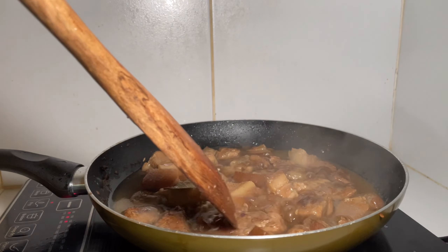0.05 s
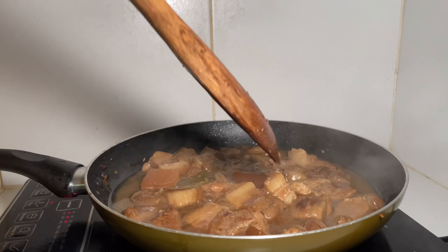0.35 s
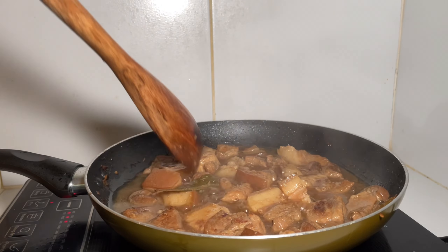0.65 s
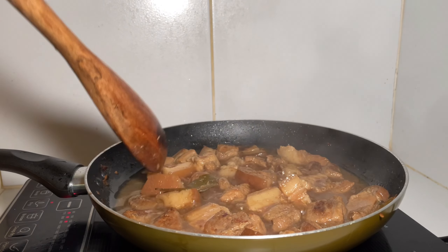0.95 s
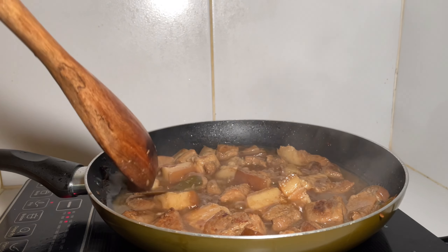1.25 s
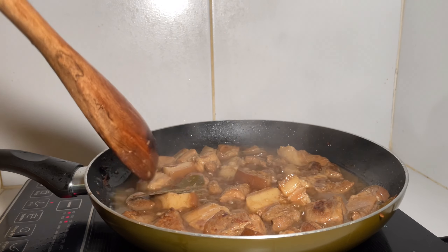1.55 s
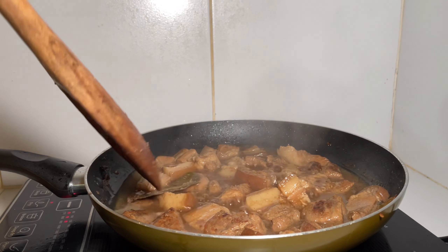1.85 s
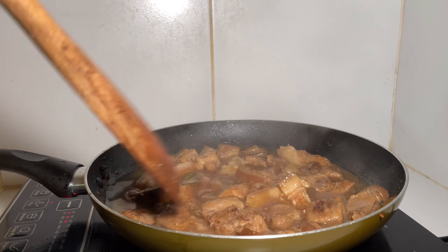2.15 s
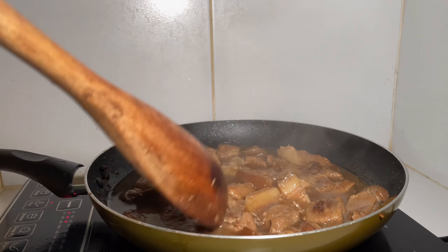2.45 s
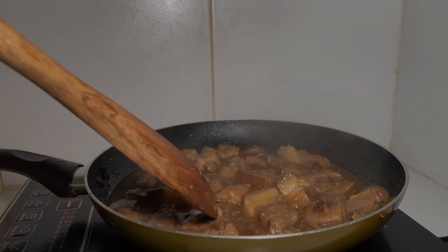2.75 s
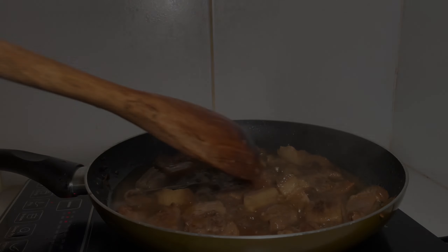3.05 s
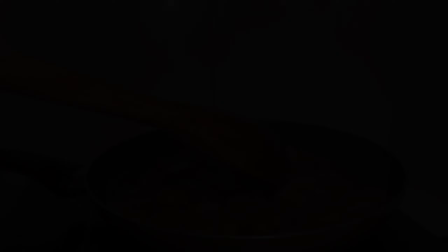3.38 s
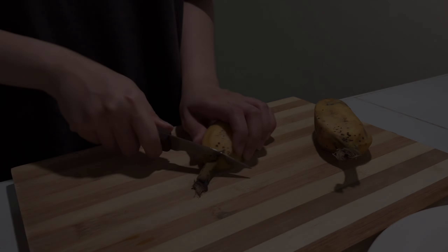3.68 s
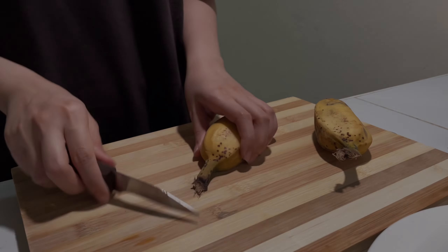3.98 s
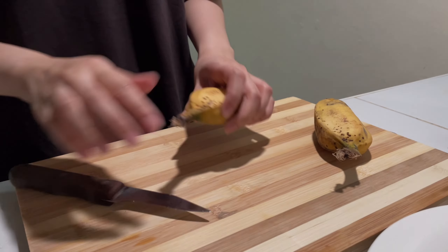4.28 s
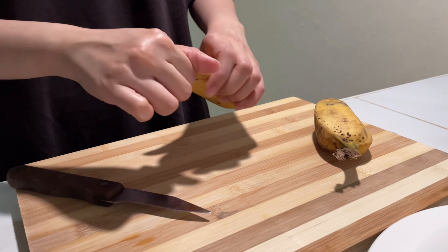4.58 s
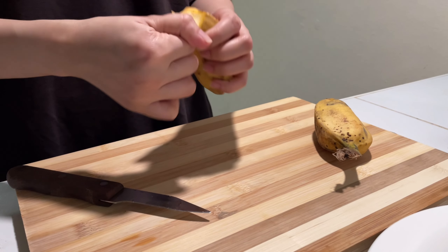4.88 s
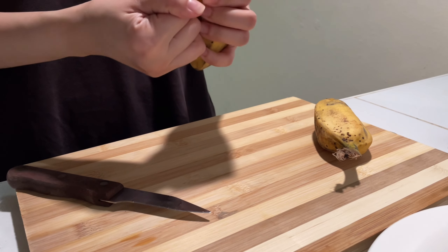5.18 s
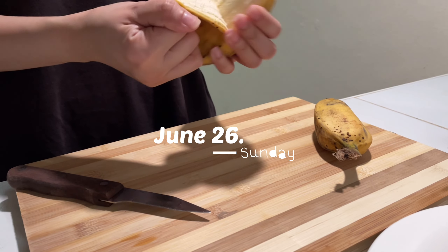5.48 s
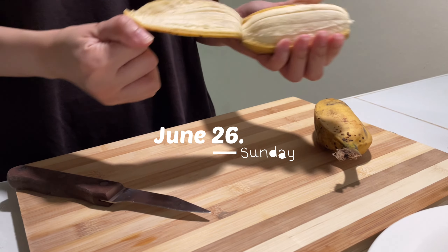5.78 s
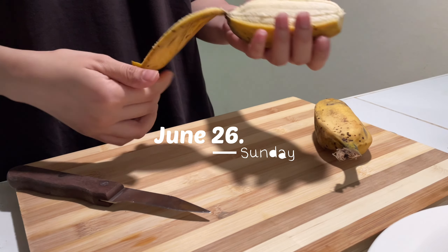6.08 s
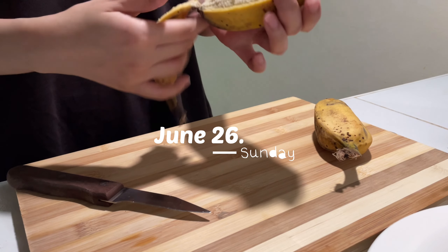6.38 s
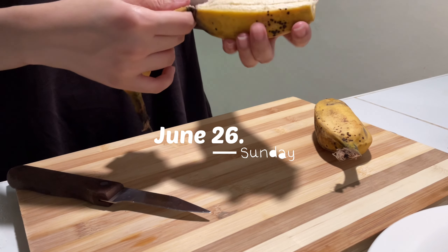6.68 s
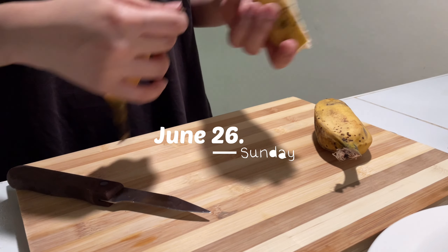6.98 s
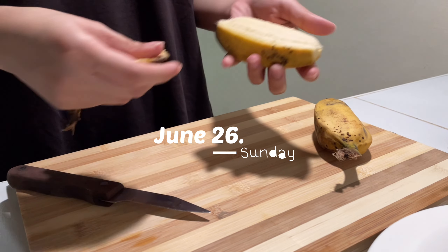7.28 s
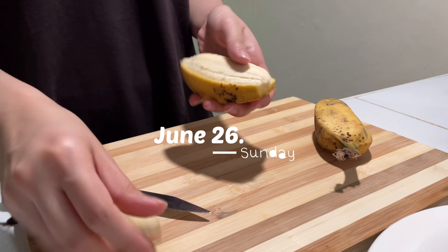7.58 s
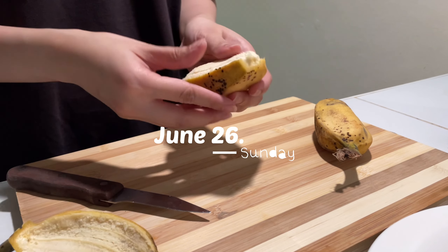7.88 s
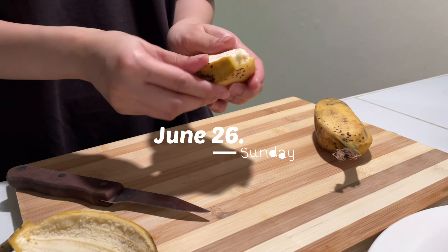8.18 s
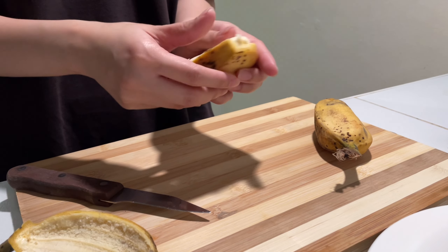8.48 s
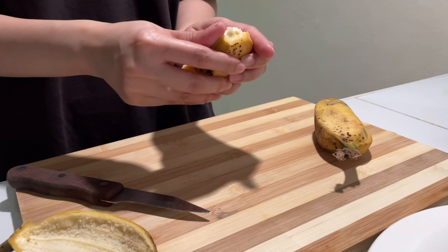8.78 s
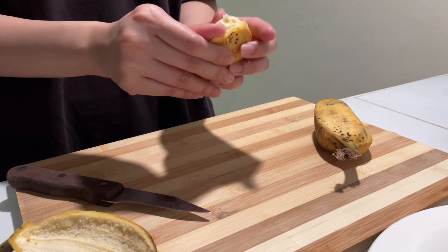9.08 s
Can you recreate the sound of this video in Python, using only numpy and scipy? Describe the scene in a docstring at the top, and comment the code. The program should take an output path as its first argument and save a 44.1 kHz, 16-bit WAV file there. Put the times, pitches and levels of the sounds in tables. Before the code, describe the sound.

A stew bubbles and spits as a wooden spatula stirs, then a knife clatters onto a board and a banana peel snaps and tears.

```python
"""A stew simmers in a pan: bubbles ring as they burst and fat spits, while the induction hob hums
and a wooden spatula scrapes the meat about. Then, at a quiet table, a knife crunches through
a banana stem and clatters down on a bamboo board. The peel cracks as its fibres break,
snaps twice and tears away, and the wet strip flops on the board."""
import sys
import numpy as np
from scipy import signal
from scipy.fft import rfft, irfft, next_fast_len
from scipy.io import wavfile

SR = 44100
rng = np.random.default_rng(int(sys.argv[2]) if len(sys.argv) > 2 else 0)


def generate_wav(sig):
    """Save sig (samples, or channels by samples) to the path in sys.argv[1] as 16-bit PCM at SR."""
    pcm = np.round(np.clip(np.atleast_2d(sig).T, -1, 1) * 32767).astype(np.int16)
    wavfile.write(sys.argv[1], SR, pcm)


N = 407484
TIME = np.arange(N) / SR
STEW_START_S, STEW_END_S, TABLE_START_S = .666, 3.445, 3.451
TOP_HZ = 15900

# The tone of rubbed or torn banana peel: pitch_hz, level_db
PEEL_RUSTLE = [(1500, -23), (2500, -9), (4000, -7), (5200, -2), (6400, 0), (7500, -1.5), (9000, 1.5),
               (10300, -1), (11500, -6.5), (14000, -4.5), (16000, -5)]


def undb(db):
    """Turn decibels into a number to multiply a sound by."""
    return 10 ** (np.asarray(db) / 20)


def level(x, db=0):
    """Set a sound's average (rms) level."""
    return x * undb(db) / np.sqrt(np.mean(x ** 2) + 1e-30)


def curve(rows):
    """A volume that glides between points of time_s, level_db."""
    times, db = np.transpose(rows)
    return undb(np.interp(TIME, times, db))


def during(start, end):
    """One between two times, zero outside."""
    return (TIME >= start) & (TIME < end)


def swell(start, length, rise_s, fade_s):
    """The volume of one movement: it builds up, holds until its length is over, then dies away."""
    rise = np.clip((TIME - start) / rise_s, 0, 1)
    return rise * np.exp(-np.clip((TIME - start - length) / fade_s, 0, 20))


def moves(rows, rise_s, fade_s, column=2):
    """The volume of a run of movements; rows hold start_s, length_s and, in `column`, level_db."""
    return np.max([undb(row[column]) * swell(row[0], row[1], rise_s, fade_s) for row in rows], axis=0)


def add(out, start_s, x):
    """Mix a sound in at a given time."""
    i = int(start_s * SR)
    out[i:i + len(x)] += x[:N - i]


def band(x, hz, width):
    """Let through the pitches around hz and weaken the rest."""
    angle = 2 * np.pi * min(hz, TOP_HZ) / SR
    damping = np.sin(angle) * abs(width) / hz / 2
    return signal.lfilter([damping, 0, -damping], [1 + damping, -2 * np.cos(angle), 1 - damping], x + 1e-18)


def steep(x, hz, width):
    """The band filter used twice, so far-off pitches are weaker still."""
    return band(band(x, hz, width), hz, width)


def ring(x, notes):
    """An object rings at its own notes when x shakes it."""
    return sum(undb(db) * band(x, hz, width / np.sinc(2 * hz / SR)) for hz, width, db in notes)


def chime(notes, hold=0., size=8192):
    """A struck object's notes start at once, hold, then fade; wider notes fade faster."""
    t = TIME[:size]
    fading_s = np.maximum(t - hold, 0)
    waves = sum(undb(db) * np.exp(-np.pi * abs(width) * fading_s)
                * np.sin(2 * np.pi * (hz * t + rng.random())) for hz, width, db in notes)
    return waves * np.minimum(t / 0.00023, 1)


def colour(x, points):
    """Shape a long sound's tone by points of pitch_hz, level_db; its average level becomes 1."""
    size = next_fast_len(N)
    hz, db = np.transpose(points)
    pitches = np.fft.rfftfreq(size, 1 / SR)
    gain = undb(np.interp(np.log(pitches + 1), np.log(hz), db))
    return level(irfft(rfft(x, size) * gain, size)[:N])


def noise(size=N):
    """An even hiss (white noise)."""
    return rng.standard_normal(size)


def walk(rate):
    """A random drift, about 1 either way, that heads for a new value `rate` times a second."""
    return np.interp(TIME * rate, np.arange(N), noise())


def grains(rate, spread_db):
    """About `rate` random clicks a second, mostly small and a few large."""
    strength = undb(spread_db * np.minimum(rng.exponential(size=N), 5))
    happens = rng.random(N) < rate / SR
    return level(happens * strength * np.sign(noise()))


def burst(decay_s, hold=0., size=8192):
    """The chatter of a contact: tiny slips either way that hold, then fall 60 dB in decay_s."""
    fading_s = np.maximum(np.arange(size) / SR - hold, 0)
    return np.sign(noise(size)) * np.exp(-np.log(1000) * fading_s / decay_s)


def bubbles(low_hz, high_hz, cycles, glide, spread_db, count, size=1500):
    """Each bursting bubble rings briefly and rises in pitch."""
    when, pitch, chance = rng.random((count, 3)).T[:, :, None]
    hz = low_hz * (high_hz / low_hz) ** pitch
    phase = hz * np.arange(size) / SR
    age = np.minimum(phase / cycles, 2) / 2  # runs from 0 to 1
    volume = undb(-spread_db * np.log(chance + 0.029)) * np.exp(-np.log(1000) * age)
    waves = volume * np.sin(2 * np.pi * phase * (1 + glide * age))
    start_s = STEW_START_S + when * (STEW_END_S - STEW_START_S)
    index = (start_s * SR).astype(int) + np.arange(size)
    out = np.bincount(index.ravel(), waves.ravel(), N)  # add all the bubbles together
    return out / out[during(STEW_START_S, STEW_END_S)].std()


def stew():
    """Countless small bubbles blend with the fan into a wash; larger ones plop, and fat sizzles."""
    # The tone of broth and fan together: pitch_hz, level_db
    broth_tone = [(25, -4.5), (100, -2.5), (200, -6), (300, 0.5), (440, -7), (700, -2), (950, -5),
                  (1230, -3), (2200, -11.5), (2700, -12.5), (4700, -19), (6200, -28.5), (8800, -26.5),
                  (16000, -47)]
    # The simmer grows livelier as it is stirred: time_s, level_db
    simmer = [(.7, -46), (2.4, -44), (3.2, -43), (3.44, -44)]
    # Fat spitting: start_s, level_db, pitch_hz
    spits = [(1.6327, -34, 2810), (1.713, -29, 4200), (1.7659, -30.5, 2760), (2.0748, -29.5, 1700),
             (2.396, -30, 2240), (2.7053, -40, 2110), (3.1776, -24, 2400)]
    wash = colour(noise() + 0.66 * grains(rate=3000, spread_db=4.5), broth_tone)
    wash *= undb(1.2 + .5 * walk(13))
    plops = bubbles(low_hz=323, high_hz=2804, cycles=28, glide=0.25, spread_db=6.5, count=900)
    pips = bubbles(low_hz=1850, high_hz=6000, cycles=23, glide=0.16, spread_db=2.5, count=500)
    sizzle = level(band(grains(rate=1400, spread_db=3), 5800, 6000), -17.5) * undb(1.9 * walk(12))
    out = curve(simmer) * (wash + undb(-5.5) * plops + undb(-12.5) * pips + sizzle)
    for start, db, hz in spits:
        spit = band(burst(decay_s=0.028), hz, 0.47 * hz)
        add(out, start, spit / np.abs(spit).max() * undb(db - 5))
    return out


def hob():
    """The fan hums at twice its turning rate; the coil whistles louder as the hum swells."""
    # The hum swelling and sinking: time_s, level_db
    hum_levels = [(0.68, -67), (0.83, -57), (1.06, -63), (1.4, -54), (1.45, -67), (1.98, -49),
                  (2.23, -57.5), (2.7, -45.5), (2.76, -55.5), (3.43, -53.5)]
    # The hob's steady tones: pitch_hz, level_db
    hob_tones = [(242.3, -53.5), (512, -63.5), (716, -69), (953, -72), (1109.5, -67.5), (1192, -69.5),
                 (7550, -77), (8750, -81)]
    turns_per_s = 74.3 * (1 + 0.0068 * walk(5.74))
    turn = 2 * np.pi * np.cumsum(turns_per_s) / SR
    volume = curve(hum_levels)
    waver = undb(0.5 + 0.5 * walk(8.98))
    hum = volume * waver * (np.sin(2 * turn) + undb(-15 + 2 * walk(3.5)) * np.sin(turn))
    tones = sum(undb(db + 1.3 * walk(6.06)) * np.sin(2 * np.pi * hz * TIME + 0.34 * walk(7.07))
                for hz, db in hob_tones)
    whistle = level(steep(noise(), 11930, 400)) * np.sqrt(volume) * undb(-52 + 1.5 * walk(3))
    return np.sqrt(2) * (hum + tones) + whistle


def spatula():
    """Wood sticks and slips on the pan, muffled by the broth; each stroke starts fast and eases off."""
    # Pushes across the pan and short knocks against it: start_s, length_s, level_db, pitch_hz, width_hz
    strokes = [(1.258, 0.15, -48, 1090, 1000), (2.297, 0.019, -42, 1400, 1390),
               (2.367, 0.052, -34.5, 360, 516), (2.602, 0.21, -47, 740, 130),
               (2.803, 0.035, -44, 2730, 1790), (2.879, 0.025, -40.5, 396, 450),
               (2.958, 0.12, -46, 220, 89.5), (3.181, 0.17, -44.5, 1030, 550)]
    out = np.zeros(N)
    for start, length, db, hz, width in strokes:
        slips = level(steep(grains(rate=3500, spread_db=3.5)[:SR], hz, 1.15 * width), db)
        push = np.interp(TIME[:SR] / length, [0, .1, .5, 1.4], [0.86, 1.13, 0.78, 0.066])
        add(out, start, slips * push)
    return out


def room(x):
    """Echoes from the walls blur together; the high notes die first."""
    # How the room dies away: pitch_hz, decay_s, level_db
    echo_bands = [(201, 1, -1.5), (498, 0.38, 5), (1190, 0.53, 2.5), (2430, .4, -3), (5100, 0.385, 1.5),
                  (10000, .25, -7.5)]
    t = TIME[:SR]
    tail = sum(undb(db) * steep(noise(SR), hz, 1.3 * hz) * np.exp(-np.log(1000) * t / decay)
               for hz, decay, db in echo_bands)
    tail *= np.clip(t / .005 - .6, 0, 1)  # the first echoes take a moment to arrive
    return signal.fftconvolve(x, tail / np.sqrt(np.sum(tail ** 2)))[:N]


def kitchen():
    """Still air, a low appliance drone and a thin whine that slowly grows louder."""
    # The tone of the quiet room: pitch_hz, level_db
    air_tone = [(15, -35), (25, -27.5), (59, 3), (92, -4.5), (206, -5.5), (317, -7), (416, -8.5),
                (818, -12), (911, -12.5), (1070, -15), (2350, -20.5), (2760, -22.5), (5140, -27),
                (8140, -39), (16000, -51)]
    # The appliance's low notes: pitch_hz, width_hz, level_db
    drone_notes = [(83.5, 11, -56), (114, 14, -57.5), (169, 17, -58.5), (228, 8.4, -61), (294.4, 18, -59),
                   (342.6, 12, -62.5)]
    air = colour(noise(), air_tone) * undb(-52.5 + .5 * walk(3.3))
    drone = sum(level(steep(noise(), hz, 1.5 * width), db) for hz, width, db in drone_notes)
    whine_hz, whine_db = 902.5, -62 + 0.7 * (TIME - TABLE_START_S)
    whine = level(np.sin(2 * np.pi * whine_hz * TIME + .1 * walk(6.9)))
    return air + drone + whine * undb(whine_db)


def stem_cut():
    """One push of the blade crunches through wet fibres, which give way unevenly."""
    # The tone of the crunch: pitch_hz, level_db
    stem_tone = [(120, -47), (200, -12), (548, -16), (623, 1), (696, -8), (777, -4), (883, -9), (2170, -17),
                 (2910, -11.5), (16000, -30.5)]
    push = swell(start=3.454, length=0.035, rise_s=0.02, fade_s=0.021) * undb(-35 + 1.8 * walk(250))
    return colour(noise() + grains(rate=4600, spread_db=5.5), stem_tone) * push


def fibre_cracks():
    """Single fibres of the stem and peel give way: one sharp tick, then a short ring."""
    # Fibres breaking: start_s, level_db, pitch_hz, decay_s
    cracks = [(3.476, -24, 5000, .025), (3.4915, -26, 3500, .02), (3.781, -43, 3950, 0.037),
              (3.945, -40, 3880, 0.024), (3.965, -34, 3380, 0.031), (4.641, -42.5, 9000, 0.016),
              (4.671, -39, 5900, 0.019), (4.7077, -27.5, 5700, 0.049), (4.805, -44, 8000, .019),
              (4.912, -28, 6800, 0.047), (5.134, -29, 10100, 0.011), (5.1763, -22, 8450, 0.011),
              (5.2477, -37.5, 10000, .006), (5.271, -29, 8500, 0.016), (5.279, -21.5, 7790, 0.02),
              (5.3016, -36, 9000, .012), (5.482, -29.5, 9200, .022), (5.829, -35.5, 8500, 0.013),
              (5.848, -37, 5500, .018), (6.9286, -25.5, 9490, 0.02), (6.9297, -31.5, 2630, 0.046),
              (7.2155, -39, 7500, 0.05), (8.232, -34.5, 8400, 0.035), (9.212, -37, 7000, 0.018)]
    out = np.zeros(N)
    for start, db, hz, decay in cracks:
        tail = steep(burst(decay), hz, 0.81 * hz)
        tick = 10 * signal.unit_impulse(len(tail)) + burst(0.46 * decay)
        crack = steep(tick, hz, 1.2 * hz) + 0.65 * tail
        add(out, start, crack / np.abs(crack).max() * undb(db + 1.5))
    return out


def board_knocks():
    """The knife knocks, drops and rocks on the board; a harder contact wakes higher notes."""
    # Blows on the board: start_s, level_db, pitch_hz, decay_s
    knocks = [(3.509, -24.5, 1950, 0.021), (4.102, -26.5, 900, 0.044), (4.142, -6, 1900, 0.05),
              (4.1436, -11, 610, 0.085), (4.1831, 2, 1630, 0.045), (4.227, -16.5, 1270, 0.059),
              (4.239, -20, 693, 0.031), (4.284, -8.5, 1680, 0.043), (4.3133, -7.5, 1570, 0.044)]
    # The notes of knife and board together: pitch_hz, width_hz, level_db
    board_notes = [(290, 310, -21.5), (594, 130, 12.5), (770, 310, 3.5), (1136, 210, 11), (1240, 270, -3),
                   (1460, 59, -10.5), (1600, 70, 1.5), (1880, 120, -2.5), (2090, 120, 7), (2230, 200, 3),
                   (2800, 160, -16.5), (3020, 180, 6.5), (3420, 250, 1), (4100, 170, -10.5),
                   (5540, 720, -8), (7040, 1200, -33)]
    out = np.zeros(N)
    for start, db, hz, decay in knocks:
        contact = burst(decay) + 2.24 * burst(decay_s=0.0069)
        force = band(contact, hz, 0.7 * hz)
        wood_clack = undb(5.5) * steep(force, 1180, 2550)
        table_thud = undb(-1.5) * steep(contact, 252, 300)
        knock = ring(force, board_notes) + wood_clack + table_thud
        add(out, start, level(knock, db - 26) * np.sqrt(decay / 0.034))
    return out


def fingers():
    """Fingertips stick and slip on the skin: a faint rustle of tacky ticks."""
    # Slides along the banana: start_s, length_s, level_db
    slides = [(3.54, .06, -70), (3.72, 0.056, -68), (3.92, 0.076, -66), (4.05, 0.38, -64.5),
              (4.47, 0.029, -64.5), (4.67, 0.15, -68.5), (4.92, 0.14, -69), (6.21, .1, -71),
              (6.93, 0.072, -63.5), (7.15, .18, -76.5), (7.54, 0.12, -64), (7.75, 0.034, -65),
              (7.86, 0.087, -67.5), (8.01, .2, -76), (8.235, .115, -66), (8.79, 0.047, -69),
              (8.98, .14, -72), (9.1, 0.18, -63)]
    ticks = colour(noise() + 1.8 * grains(rate=750, spread_db=4), PEEL_RUSTLE)
    return ticks * moves(slides, rise_s=0.02, fade_s=0.041) * undb(2 * walk(45))


def blade_clinks():
    """As the knife drops, its steel tip touches first and rings."""
    # The tip lands and bounces: start_s, level_db
    clinks = [(4.0329, -20.5), (4.0455, -25), (4.0539, -35)]
    # The blade's own notes: pitch_hz, width_hz, level_db
    blade_notes = [(730, 91, -7), (1176, 45, -5), (1580, 190, 7), (3100, 140, 3), (3430, 190, 6),
                   (4050, 160, 3.5), (4500, 180, -11), (5560, 130, -18), (6700, 420, -5.5)]
    out = np.zeros(N)
    for start, db in clinks:
        steel = chime(blade_notes)
        chatter = 0.73 * steep(burst(decay_s=0.081), 2500, 2300)
        tick = 2.1 * steep(burst(decay_s=0.013), 3400, 1900)
        add(out, start, undb(db) * (steel + chatter + tick))
    return out


def soft_flops():
    """Fingers pat the fruit and the wet strip lands end by end, too soft to ring."""
    # Soft touches: start_s, level_db, pitch_hz, decay_s
    flops = [(4.474, -49.5, 408, 0.037), (7.607, -39, 2580, 0.03), (7.609, -35.5, 560, 0.023),
             (7.6507, -34.5, 850, 0.05), (7.6629, -32.5, 2150, 0.034), (7.665, -41, 616, .05),
             (8.233, -45, 620, .06)]
    out = np.zeros(N)
    for start, db, hz, decay in flops:
        flop = steep(burst(decay), hz, 1.06 * hz)
        add(out, start, level(flop, db - 19) * np.sqrt(decay / 0.043))
    return out


def peeling():
    """Each pull parts fine fibres in an uneven crackle, with a wet rasp and a dull rub of the hands."""
    # Pulls on the peel: start_s, length_s, crackle_db, rasp_db
    pulls = [(5.07, 0.14, -57, -78), (5.27, 0.14, -56, -64), (5.44, 0.085, -52.5, -63),
             (5.59, 0.16, -52.5, -64), (5.68, 0.11, -53.5, -60.5), (5.8, 0.051, -57, -68)]
    pull = moves(pulls, rise_s=.05, fade_s=.022)
    wetness = moves(pulls, rise_s=.05, fade_s=.022, column=3)
    grip = moves(pulls, rise_s=.05, fade_s=.3)
    fibres = grains(rate=1200, spread_db=4)
    crackle = colour(noise() + 1.3 * fibres, PEEL_RUSTLE) * pull * undb(-.5 + 1.74 * walk(60))
    rasp = level(steep(noise() + grains(rate=2100, spread_db=7), 2650, 2000)) * wetness
    rub = level(band(noise(), 440, 600)) * grip * undb(-1 + 1.5 * walk(25))
    return crackle + rasp + rub


def peel_snaps():
    """A whole bundle of fibres breaks at once: the peel rings and the fruit jolts in the hand."""
    # The two snaps: start_s, level_db, tear_s, thump_db, thump_hz, pop_db
    snaps = [(5.5084, -14, 0.0011, -24.5, 187.5, -24), (5.6151, -15.5, .0018, -21, 152.5, -47)]
    # The peel's own notes: pitch_hz, width_hz, level_db
    peel_notes = [(2090, 170, -20.5), (2840, 152, -14.5), (3430, 73, -20.5), (3930, 130, -7.5),
                  (4830, 400, -14.5), (6246, 510, -1), (6500, 150, -2), (8230, 400, -11), (8860, 260, -4),
                  (9150, 350, -6), (10140, 200, 1.5), (10200, 400, -2), (13200, 260, -2),
                  (14300, 300, -0.5)]
    out, t = np.zeros(N), TIME[:8192]
    for start, db, tear_s, thump_db, thump_hz, pop_db in snaps:
        ringing = chime(peel_notes, hold=tear_s)
        rip = 1.4 * steep(burst(decay_s=.014, hold=tear_s), 8000, 12000)
        crack = undb(db) * (ringing + rip)
        thump = undb(thump_db) * np.sin(2 * np.pi * thump_hz * t) * np.exp(-t / 0.0056)
        hollow_pop = undb(pop_db) * chime([(880, 97, 0), (342, 42, -8.5)])
        add(out, start, crack + thump + hollow_pop)
        add(out, start + 0.011, undb(-27.5) * crack)  # echo from the wall
    return out


def scene():
    """First the stove in its tiled corner, then the table."""
    pan = stew()
    stove = undb(-2) * (pan + undb(-11) * room(pan)) + hob() + spatula()
    knife = board_knocks() + blade_clinks()
    handling = fibre_cracks() + soft_flops()
    snaps = peel_snaps()
    echoes = room(undb(-17.5) * knife + undb(-14) * handling + undb(-30) * snaps)
    table = stem_cut() + knife + handling + snaps + peeling() + fingers() + kitchen() + echoes
    return (stove * during(STEW_START_S, STEW_END_S) + table * (TIME >= TABLE_START_S))[None]


def record(dry):
    """Clip peaks beyond full scale and cut the highest treble."""
    treble_cut = signal.ellip(8, .2, 70, TOP_HZ, fs=SR, output="sos")
    return signal.sosfilt(treble_cut, np.clip(dry, -1, 1))


dry = scene()
out = record(dry)
generate_wav(out)
```